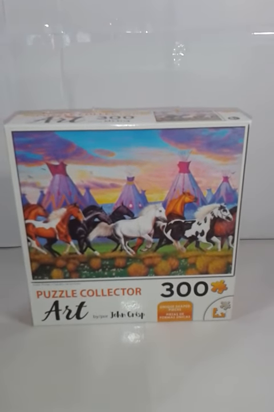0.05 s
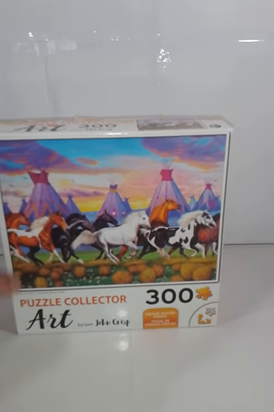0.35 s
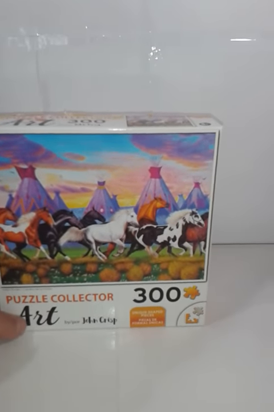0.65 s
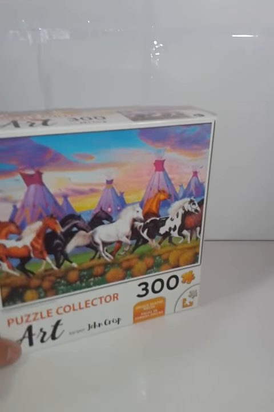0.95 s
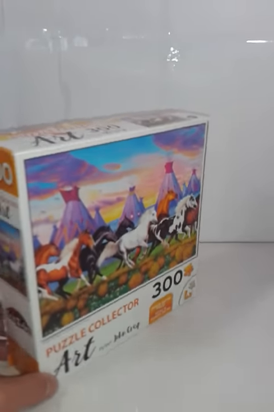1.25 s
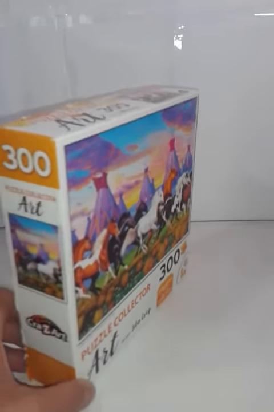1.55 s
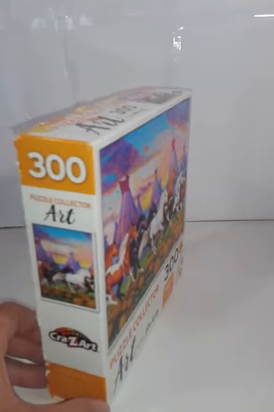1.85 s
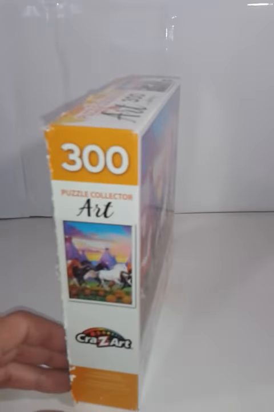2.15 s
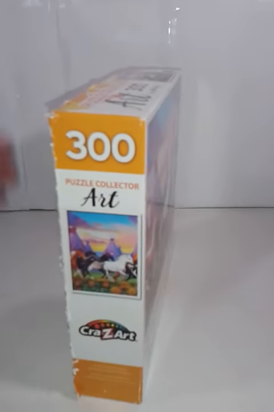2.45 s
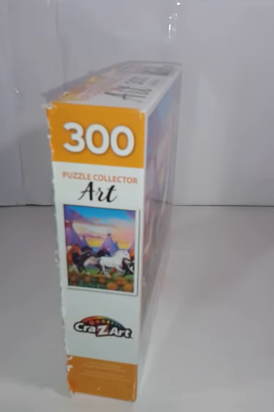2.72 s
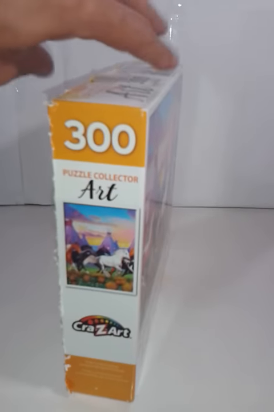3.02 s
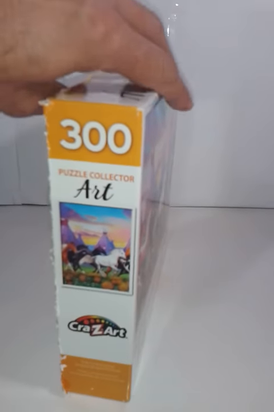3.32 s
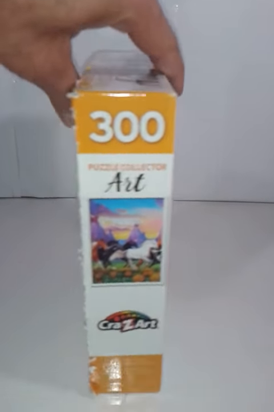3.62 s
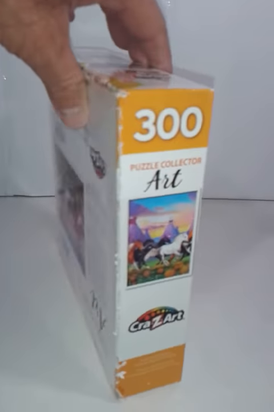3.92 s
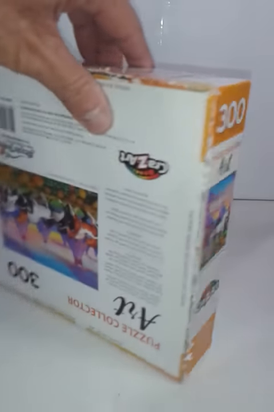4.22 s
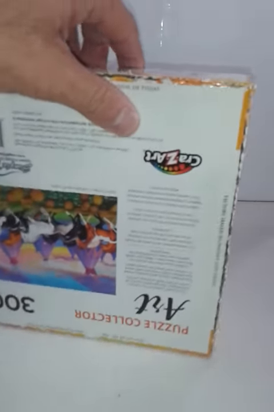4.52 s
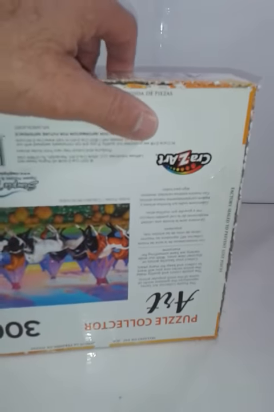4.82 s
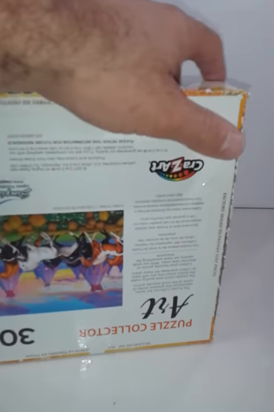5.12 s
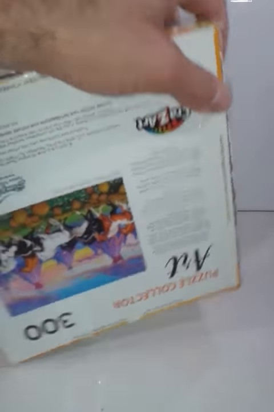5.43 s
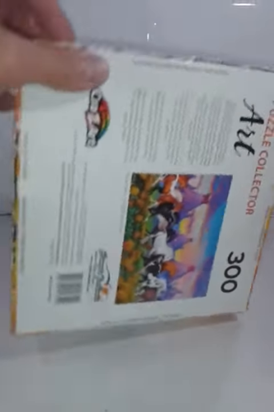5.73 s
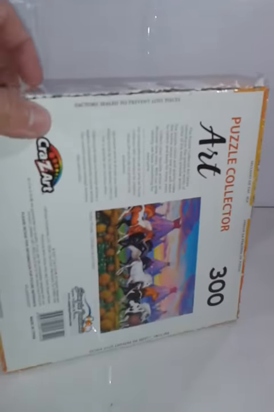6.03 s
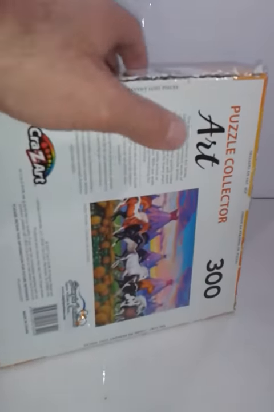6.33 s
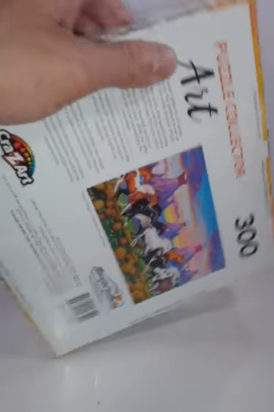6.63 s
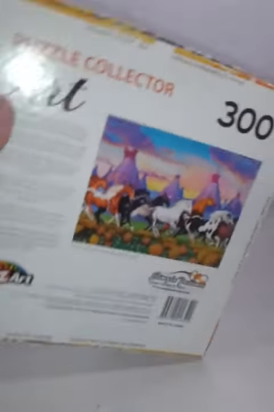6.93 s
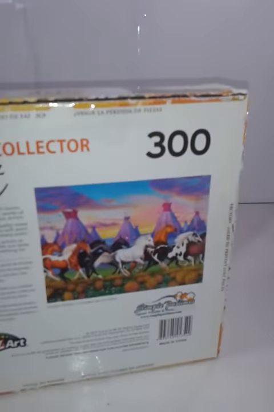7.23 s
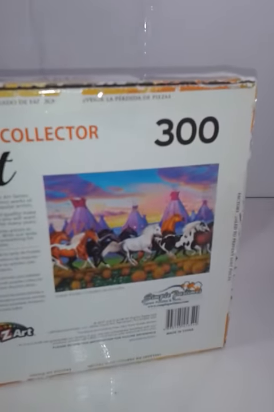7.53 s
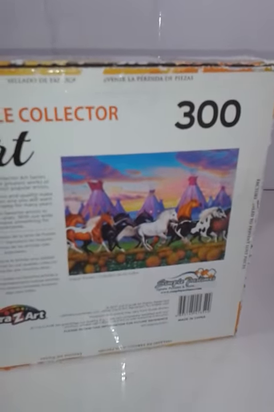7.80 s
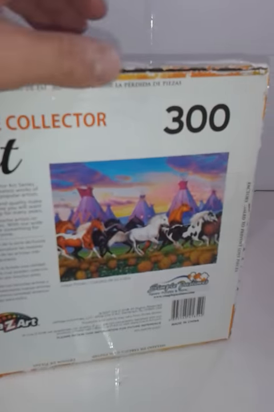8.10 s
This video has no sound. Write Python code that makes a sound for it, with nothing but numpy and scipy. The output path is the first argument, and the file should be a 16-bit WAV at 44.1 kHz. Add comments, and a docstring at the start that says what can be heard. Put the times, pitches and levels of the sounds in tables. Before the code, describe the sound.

Soft strokes of card rubbing on a hard tabletop come first, with small finger ticks and a faint, thin squeak. After about five seconds the box tips, and loose puzzle pieces clatter hollowly inside as it lands with a thud. A second later it tips again, harder, then settles with a few weaker knocks. The sound is near the microphone, over the faint low rush of a small room.

```python
"""A soft hiss of card on a smooth table: a box of jigsaw pieces is slid and turned in a quiet room.
Its edge sings faintly as it sticks and slips, while fingers rub and tick on the lid. Then the box is
tipped over twice: each time the pieces tumble against the walls in a run of hollow knocks, and the
landing flexes the whole box with a thud."""
import sys
import numpy as np
from scipy import signal
from scipy.fft import rfft, irfft
from scipy.io import wavfile
from scipy.ndimage import map_coordinates

SR = 44100
rng = np.random.default_rng(int(sys.argv[2]) if len(sys.argv) > 2 else 0)


def put_to_file(sound):
    """Save the sound as 16-bit audio at rate SR, in the file named by the first command-line argument."""
    columns = np.atleast_2d(sound).T  # one column per channel
    safe = np.clip(columns, -1, 1)
    whole_steps = np.round(safe * 32767)
    wavfile.write(sys.argv[1], SR, whole_steps.astype(np.int16))


N = 359856


def from_db(db):
    return 10 ** (np.asarray(db) / 20)


def rms_one(x):
    return x / np.sqrt(np.mean(x ** 2) + 1e-20)


def unit_blow(x, blow_s=.006):
    """Scale a pulse to the energy of rms 1 held for the length of a blow."""
    return x / np.sqrt(np.sum(x ** 2) / (blow_s * SR) + 1e-20)


def at_hz(points, hz):
    """Read a curve on a log-frequency axis."""
    f, value = np.transpose(points)
    return np.interp(np.log(np.maximum(hz, 1)), np.log(f), value)


def add(out, start_s, pulse):
    i = int(start_s * SR)
    out[i:i + len(pulse)] += pulse[:N - i]


def butter(x, order, hz, kind="low"):
    return signal.sosfilt(signal.butter(order, hz, kind, fs=SR, output="sos"), x)


def colour(x, spectrum, size=4096):
    """Minimum-phase EQ: nothing rings ahead of an attack."""
    gain = from_db(at_hz(spectrum, np.arange(size // 2 + 1) * SR / size))
    cepstrum = irfft(np.log(gain))
    cepstrum[1:size // 2] *= 2
    cepstrum[size // 2 + 1:] = 0
    return signal.fftconvolve(x, irfft(np.exp(rfft(cepstrum))))[:len(x)]


def drift(per_s):
    """A random wander with rms 1."""
    knots = rng.standard_normal(4096)
    return rms_one(map_coordinates(knots, [np.arange(N) / SR * per_s], order=1, mode="wrap"))


def grains(per_s, spread_db):
    """Random clicks of uneven size and sign."""
    sizes = from_db(spread_db * np.minimum(rng.exponential(1, N), 4)) * rng.choice([-1, 1], N)
    return sizes * (rng.random(N) < per_s / SR)


# Room tone EQ. Each row: frequency in Hz, gain in dB.
ROOM_TONE_EQ = [(15, -56.5), (25, -30), (51, -15), (124, -2), (205, -4.5), (228, -9), (399, -13.5),
                (563, -16), (644, -21), (840, -18), (1160, -18.5), (1360, -21), (1550, -19), (4620, -37),
                (14500, -31.5)]

def room_tone(level_db=-57.5):
    """The faint, steady, low rush of the room."""
    return from_db(level_db) * rms_one(colour(rng.standard_normal(N), ROOM_TONE_EQ))


# Reverb decay. Each row: frequency in Hz, seconds to fall 60 dB.
REVERB_T60 = [(100, 0.57), (300, 0.82), (1000, 0.22), (4000, 0.19), (12000, 0.13)]
# Reverb return. Each row: frequency in Hz, level in dB.
REVERB_DB = [(100, -10), (300, -8), (800, -15.5), (2000, -11), (4000, -10.5), (12000, -7.5)]

def reverb(x, first_echo_s=0.013):
    """A diffuse tail that swells in up to the first wall echo and dies octave by octave."""
    t = np.arange(SR) / SR
    white, hz = rfft(rng.standard_normal(SR)), np.arange(SR // 2 + 1)
    onset = np.clip(2 * t / first_echo_s - 1, 0, 1) ** 2
    edges_hz, tail = 40 * 2. ** np.arange(10), 0
    for low, high in zip(edges_hz, edges_hz[1:]):
        centre = np.sqrt(low * high)
        fade = onset * from_db(-60 * t / at_hz(REVERB_T60, centre))
        band = irfft(white * (hz >= low) * (hz < high), SR)
        tail = tail + band * fade / np.sqrt(np.sum(fade ** 2)) * from_db(at_hz(REVERB_DB, centre))
    return signal.fftconvolve(x, tail)[:N]


# Pushes of the box and strokes of the hand.
# Each row: start and end in seconds, relative levels of rub and of hiss in dB.
STROKES = [(0.4, 0.682, -63, -68), (0.668, 0.96, -59.5, -57), (1.013, 1.148, -58, -56),
           (1.2, 1.426, -59.5, -58), (1.437, 1.658, -63.5, -62.5), (1.773, 1.957, -59.5, -59.5),
           (2.035, 2.378, -67.5, -67), (2.765, 3.123, -61, -72), (3.25, 3.39, -63, -77),
           (3.486, 3.605, -62, -59), (3.61, 4.055, -60, -58.5), (4.04, 4.266, -60.5, -56),
           (4.3, 4.66, -62.5, -60), (4.684, 4.853, -65.5, -65.5), (5.188, 5.32, -63.5, -67.5),
           (5.34, 5.474, -64.5, -58.5), (5.485, 6.287, -54, -59), (6.368, 6.815, -58.5, -58.5),
           (6.846, 7.42, -59.5, -59)]

def stroke_levels(resting_rub_db=-68.5, resting_hiss_db=-69.5, attack_s=.05, ease_db_per_s=5,
                  release_s=.07):
    """Rub and hiss gains: each stroke takes hold, eases off and dies away, over the resting hand."""
    t = np.arange(N) / SR
    power = from_db([[resting_rub_db], [resting_hiss_db]]) ** 2
    for start, end, rub_db, hiss_db in STROKES:
        age = np.maximum(t - start, 0)
        shape = np.minimum(age / attack_s, 1) * from_db(-ease_db_per_s * age)
        shape *= np.exp(-np.clip(t - end, 0, 1) / release_s)
        power = power + (from_db([[rub_db], [hiss_db]]) * shape) ** 2
    return np.sqrt(power)


# EQs for the dull rub and the bright hiss of the edge. Each row: frequency in Hz, gain in dB.
RUB_EQ = [(80, -14), (170, 2), (300, 8), (500, 0), (800, 2.5), (1300, -4.5), (2100, -8), (3000, -21),
          (8000, -29)]
HISS_EQ = [(300, -14), (1200, -0.5), (1950, -4), (2400, -1), (2800, -0.5), (3300, 0.5), (4300, -3.5),
           (5200, -7), (6200, -10.5), (8300, -8.5), (11000, -11), (15000, -15)]

def friction(rub_boost_db=2.0):
    """Skin on card and card on the table: dense tiny slips under an unsteady pressure."""
    rub_gain, hiss_gain = stroke_levels()
    pressure_db = .8 * drift(per_s=45)
    rub = rub_gain * rms_one(colour(grains(2500, spread_db=2.0), RUB_EQ))
    hiss = hiss_gain * rms_one(colour(grains(6800, spread_db=1.0), HISS_EQ))
    return (from_db(rub_boost_db) * rub + hiss) * from_db(pressure_db)


def stick_slip(glides, width_hz, arch_hz=0):
    """A narrow band of noise that swells, glides and fades; mid-stroke pressure lifts it by arch_hz."""
    out = np.zeros(N)
    slips = butter(rng.standard_normal((2, N)), 2, width_hz / 2)
    for start, end, db, first_hz, last_hz in glides:
        span = np.arange(int(start * SR), int(end * SR))
        progress = np.linspace(0, 1, len(span))
        pressure = np.abs(np.sin(np.pi * progress))
        hz = first_hz + (last_hz - first_hz) * progress + arch_hz * pressure
        phase = 2 * np.pi * np.cumsum(hz) / SR
        tone = rms_one(slips[0, span] * np.cos(phase) + slips[1, span] * np.sin(phase))
        add(out, start, from_db(db) * np.sqrt(pressure) * tone)
    return out


# Friction glides. Each row: start and end in seconds, level in dB, first and last pitch in Hz.
EDGE_SINGS = [(.66, 1.62, -65.5, 2350, 2334), (.66, 1.62, -71, 3070, 3070), (1.75, 2.4, -72.5, 3100, 3020),
              (2.02, 2.42, -75, 4220, 4300), (3.46, 3.88, -65, 3280, 3270), (3.85, 4.1, -68, 4540, 4300),
              (4.03, 4.92, -66.5, 3384, 3140)]
FINGER_SKIMS = [(2.96, 3.16, -62, 1624, 1990), (3.62, 4.03, -58, 2380, 1788)]
SQUEAKS = [(4.5, 4.73, -71, 5680, 5420)]

def friction_tones():
    """The sliding edge sings, fingertips skim the lid, and one thin squeak arches up and falls away."""
    edge = stick_slip(EDGE_SINGS, width_hz=340)
    fingertips = stick_slip(FINGER_SKIMS, width_hz=900)
    squeak = stick_slip(SQUEAKS, width_hz=130, arch_hz=390)
    return edge + fingertips + squeak


def strike(modes, uneven_db, detune, low_cut_hz):
    """One blow: the place of contact sets each mode's strength and sign, the load shifts its pitch."""
    hz, db, t60 = np.transpose(modes)[:, :, None]
    strength, shift, side = rng.standard_normal((3, len(modes), 1))
    t = np.arange(SR // 10) / SR
    waves = np.sign(side) * np.sin(2 * np.pi * hz * (1 + detune * shift) * t)
    ringing = np.sum(waves * from_db(db + uneven_db * strength - 60 * t / t60), axis=0)
    # a steep high-pass cuts the ring below low_cut_hz
    return unit_blow(butter(ringing, 3, low_cut_hz, "high"))


# The hollow ring of the walls and the air inside.
# Each row: pitch in Hz, relative level in dB, seconds to fall 60 dB.
WALL_MODES = [(259, 3, 0.043), (334.7, -0.5, 0.068), (393, -4, 0.029), (461, 1, 0.033), (570, -10, .02),
              (726, 0.5, 0.034), (778, 1.5, 0.03), (946, -0.5, .026), (1100, -8, .026), (1076, -9.5, 0.03),
              (1244, -5.5, 0.028), (1418, -3, 0.028), (1566, -5, .018), (1705, -5, 0.026),
              (1865, -12.5, 0.026)]

def wall_modes(spot_hz, focus_db=5.0):
    """A spot excites best the modes near its own pitch: soft panels low, stiff corners high."""
    hz, db, t60 = np.transpose(WALL_MODES)
    return np.transpose([hz, db - focus_db * np.log2(hz / spot_hz) ** 2, t60])


def crack(t60, contact):
    """A brief contact, then the crowded, quickly damped high modes of card."""
    t = np.arange(SR // 20) / SR
    return rng.standard_normal(len(t)) * (from_db(-60 * t / t60) + contact * np.exp(-t / 0.00035))


# Small ticks of the glossy card. Each row: start in seconds, level in dB, resonance in Hz.
SNAPS = [(1.055, -55, 3200), (1.079, -51.5, 2820), (2.8367, -40, 2300), (3.587, -50, 3570),
         (3.634, -50, 3000), (5.2126, -62, 2980), (6.4215, -53, 3470), (6.7392, -42.5, 3400),
         (7.291, -55, 8400), (7.305, -56.5, 7970), (7.349, -60, 6970)]

def snaps(click_db=-14, panel_db=-9):
    """The coating snaps under a finger or an edge: a soft click, a broad resonance, a faint panel tap."""
    out = np.zeros(N)
    for start, db, hz in SNAPS:
        click = crack(t60=0.008, contact=3.0)
        resonance = signal.lfilter(*signal.iirpeak(hz, Q=2, fs=SR), click)
        softened = butter(resonance + from_db(click_db) * click, 2, 1.6 * hz)
        add(out, start, from_db(db) * unit_blow(softened))
        tap = strike(wall_modes(700, focus_db=1.0), uneven_db=6.5, detune=.03, low_cut_hz=200)
        add(out, start, from_db(db + panel_db) * tap)
    return out


# Spills of loose pieces. Each row: start and end of full flow in seconds, level in dB,
# swell and settle rates in dB per second.
SPILLS = [(5.643, 5.688, -43, 198.5, 120), (5.784, 6.017, -32, 606, 163), (6.412, 6.487, -46, 900, 450),
          (6.981, 7.016, -20, 163.5, 132), (7.16, 7.264, -45, 200, 100)]

def spill_level():
    """Flow of the loose pieces as a gain: each spill swells, holds and settles."""
    t = np.arange(N) / SR
    flows = [from_db(db - swell * np.maximum(start - t, 0) - settle * np.maximum(t - end, 0))
             for start, end, db, swell, settle in SPILLS]
    return np.max(flows, axis=0)


# EQ for the sharp attack of a hit on card. Each row: frequency in Hz, gain in dB.
CRACK_EQ = [(150, -44.5), (500, -18.5), (1500, -1.5), (2000, -1.5), (2330, 3.5), (2650, -3.5), (3050, 2),
            (3700, -2.5), (4250, -3.5), (4900, -12), (6000, -19), (7500, -16), (10000, -30.5),
            (15000, -44.5)]

def knock(body_db, crack_db, spot_hz, stiffening=0.064):
    """One knock rings the hollow box and cracks at the contact; stiffer spots crack higher."""
    out = from_db(body_db) * strike(wall_modes(spot_hz), uneven_db=4.5, detune=0.027, low_cut_hz=210)
    shifted_eq = np.array(CRACK_EQ) * [(spot_hz / 800) ** stiffening, 1]
    attack = colour(crack(t60=0.028, contact=.8), shifted_eq)
    add(out, 0, from_db(crack_db) * unit_blow(attack))
    return out


def tumble(per_s=300, crack_db=-11, spot_hz=820, spots=8):
    """Many small pieces fall on several spots of the walls, each spot with its own mix of modes."""
    body, cracks = np.zeros(N), np.zeros(N)
    for _ in range(spots):
        hits = grains(per_s / spots, spread_db=1.3)
        ringing = strike(wall_modes(spot_hz), uneven_db=-1.0, detune=0.016, low_cut_hz=220)
        body += signal.oaconvolve(hits, ringing)[:N]
        cracks += signal.oaconvolve(hits, crack(t60=.014, contact=1.5))[:N]
    return spill_level() * (rms_one(body) + from_db(crack_db) * rms_one(colour(cracks, CRACK_EQ)))


def strays(per_s=30, above_flow_db=-1.5, crack_db=-22, spot_hz=762, spread_octaves=.3, floor_db=-65):
    """Single pieces hit the walls at uneven moments, as hard as the heap is flowing."""
    out, flow = np.zeros(N), spill_level()
    count = int(per_s * N / SR)
    for k, (late, _, spot) in enumerate(rng.random((count, 3))):
        start = (k + late) / per_s
        db = 20 * np.log10(flow[int(start * SR)] + 1e-20) + above_flow_db
        if db > floor_db:
            hz = spot_hz * 2 ** (spread_octaves * (2 * spot - 1))
            add(out, start, knock(db, db + crack_db, hz))
    return out


# The low flex of the whole box. Each row: pitch in Hz, relative level in dB, seconds to fall 60 dB.
FLEX_MODES = [(84, -12.5, .05), (123, -4.5, 0.051), (161.7, -2.5, 0.11), (229, -1, 0.13)]
# The box or the heap lands. Each row: start in seconds, relative level in dB, low cut in Hz.
THUDS = [(5.761, -21, 95), (5.826, -32, 130), (5.993, -34, 130), (6.41, -46, 130), (6.917, -17, 80),
         (6.96, -26.5, 50), (7.007, -37, 130)]

def thuds(boost_db=3):
    """Heavy landings flex the whole box; the broader the contact, the deeper the thud."""
    out = np.zeros(N)
    for start, db, low_cut_hz in THUDS:
        flexing = strike(FLEX_MODES, uneven_db=1.0, detune=.02, low_cut_hz=low_cut_hz)
        add(out, start, from_db(db + boost_db) * flexing)
    return out


# Hits of pieces and box edges. Each row: start in seconds, hollow body in dB, sharp crack in dB,
# pitch of the struck spot in Hz, number of contacts.
KNOCKS = [(1.86, -47, -62, 513, 1), (3.634, -46, -44, 530, 1), (5.487, -45, -60, 540, 2),
          (5.531, -35, -70, 844, 1), (5.592, -20, -27, 1300, 1), (5.648, -34, -61, 1050, 1),
          (5.761, -16, -29, 580, 2), (5.828, -16, -30, 805, 1), (5.844, -19.5, -49, 705, 1),
          (5.862, -21.5, -46, 740, 1), (5.883, -21.5, -39, 745, 1), (5.935, -18, -41, 720, 1),
          (5.966, -24, -34, 580, 1), (5.978, -15.5, -22.5, 1030, 1), (5.992, -12.5, -20, 1030, 1),
          (6.008, -20.5, -33, 660, 1), (6.024, -24, -39, 632, 1), (6.125, -36, -58, 690, 1),
          (6.408, -34.5, -48, 390, 3), (6.446, -35.5, -61, 457, 1), (6.473, -33, -69.5, 541, 1),
          (6.492, -36.5, -54.5, 440, 1), (6.672, -42, -68, 652, 1), (6.699, -34.5, -57, 730, 1),
          (6.751, -33.5, -41.5, 750, 1), (6.842, -26.5, -44.5, 770, 2), (6.858, -24.5, -39.5, 780, 2),
          (6.899, -16.5, -35, 786, 1), (6.917, -17, -27.5, 690, 1), (6.922, -14, -24.5, 700, 1),
          (6.934, -22.5, -32, 735, 1), (6.963, -5, -15.5, 820, 4), (7.007, -11, -16.5, 826, 1),
          (7.013, -21, -24.5, 680, 2), (7.048, -18, -36, 605, 1), (7.066, -28, -39, 790, 1),
          (7.163, -29, -38, 565, 1), (7.195, -29.5, -50, 496, 1), (7.237, -23, -44, 613, 1),
          (7.27, -30, -52, 608, 1), (7.393, -43, -60.5, 535, 1), (7.512, -44.5, -66.5, 548, 1)]

def knocks(contact_gap_s=.007, contact_loss_db=2.4):
    """The main knocks; a heavy blow bounces, each contact weaker than the last."""
    out = np.zeros(N)
    for start, body_db, crack_db, spot_hz, contacts in KNOCKS:
        for k in range(round(contacts)):
            loss_db = k * contact_loss_db
            add(out, start + k * contact_gap_s, knock(body_db - loss_db, crack_db - loss_db, spot_hz))
    return out


def scene(tick_send_db=-3.5):
    """A mono mix over the room tone: blows and ticks feed the reverb, the sliding stays dry."""
    blows = knocks() + thuds() + tumble() + strays()
    ticks = snaps()
    sliding = friction() + friction_tones()
    background = room_tone()
    tail = reverb(blows + from_db(tick_send_db) * ticks)
    return (background + tail + sliding + ticks + blows)[None]


def record(dry, cutoff_hz=14750):
    """The hardest knock clips at full scale; a steep low-pass cuts the top."""
    low_pass = signal.ellip(10, .2, 70, cutoff_hz, fs=SR, output="sos")
    return signal.sosfilt(low_pass, np.clip(dry, -1, 1))


dry = scene()
out = record(dry)
put_to_file(out)
```